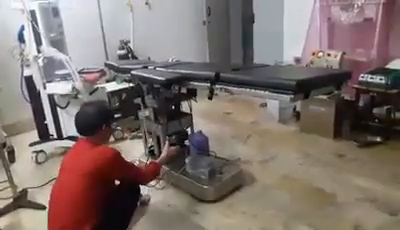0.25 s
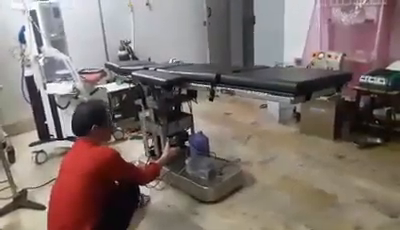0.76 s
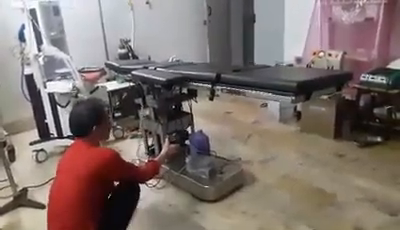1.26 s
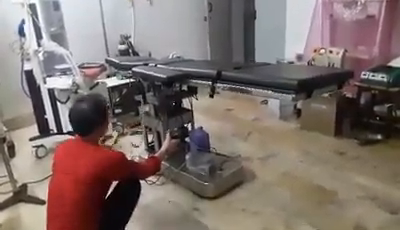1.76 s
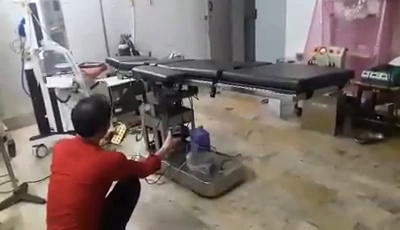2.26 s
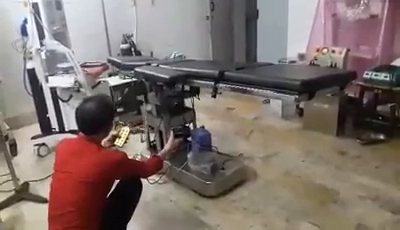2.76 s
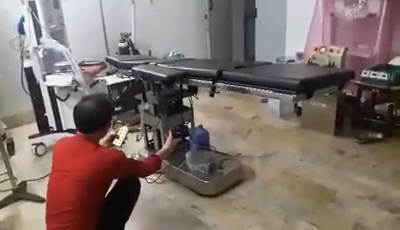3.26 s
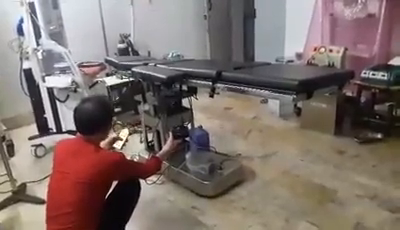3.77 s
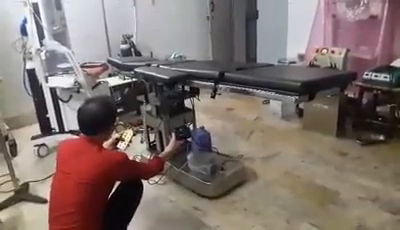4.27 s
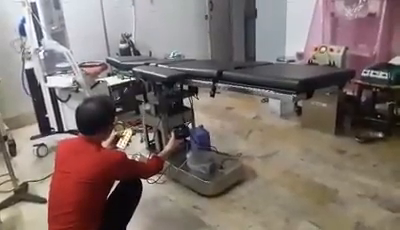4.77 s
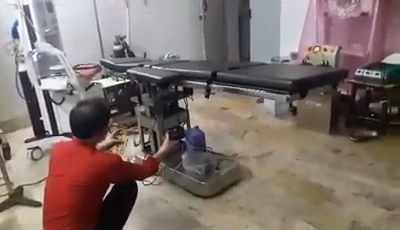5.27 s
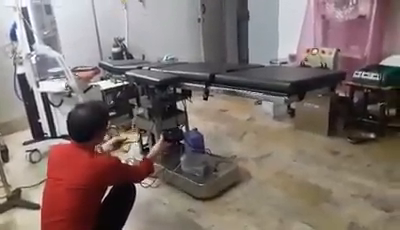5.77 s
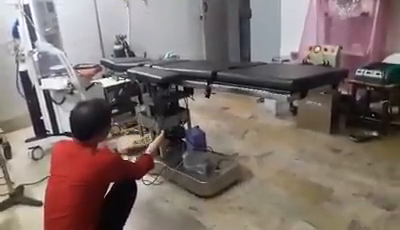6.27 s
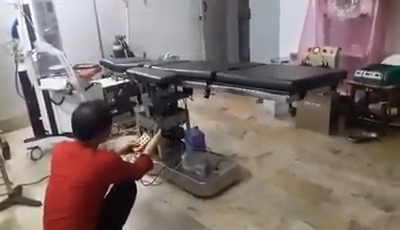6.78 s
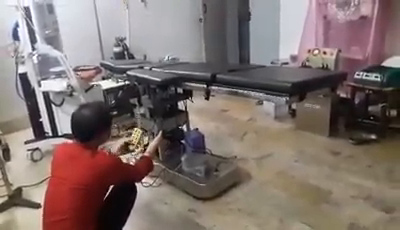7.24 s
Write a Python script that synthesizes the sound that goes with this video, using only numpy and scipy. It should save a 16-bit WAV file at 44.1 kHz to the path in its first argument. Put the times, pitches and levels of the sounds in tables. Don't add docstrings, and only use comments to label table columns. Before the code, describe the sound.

A steady electric gear motor whines and hums under a steel table in a hard-floored room, wavering slightly, with two faint cable scuffs.

```python
import sys
import numpy as np
from scipy import signal
from scipy.fft import rfft, irfft
from scipy.io import wavfile
from scipy.ndimage import uniform_filter1d

SR = 44100
rng = np.random.default_rng(int(sys.argv[2]) if len(sys.argv) > 2 else 0)


def linear_from_db(decibels):
    return 10 ** (np.asarray(decibels, float) / 20)


def waveform_to_disk(signal):
    frames = np.transpose(np.atleast_2d(signal))
    scaled = np.clip(frames, -1, 1) * 32767
    samples = np.round(scaled).astype(np.int16)
    wavfile.write(sys.argv[1], SR, samples)


N = 331191
HZ = np.fft.rfftfreq(N, 1 / SR)

HEAVY_DB = (0.5, 2.3, 0.29, 3.4)
# centre in Hz, width in Hz, level in dB rms.
FRAME_BODY = [(426.5, 27, -50), (667, 52, -46), (850, 134, -42.5)]
# frequency in Hz, level in dB rms.
FRAME = [(557.8, -60), (628.5, -47), (668.2, -49), (685.0, -49.5), (724.7, -64), (837.1, -51.5),
         (853.9, -52.5), (901.0, -45), (913.8, -51.5), (937.4, -53)]
# centre in Hz, width in Hz, level in dB rms.
HOUSING_BODY = [(1223, 230, -47), (1427, 88, -36), (1851, 260, -43), (2310, 770, -52.5), (2698, 290, -44),
                (3427, 220, -46.5), (4145, 390, -51.5)]


def gears():
    # frequency in Hz, level in dB rms.
    mesh_lines = [(264.5, -53.5), (292.7, -45.5), (310.2, -43), (326.4, -50.5), (335.8, -52.5),
                  (343.2, -45.5)]
    # centre in Hz, width in Hz, level in dB rms.
    gear_body = [(325, 99, -50.5)]
    # time in s, half length in s, change in dB.
    mesh_swells = [
        (1.7, .3, 9),
        (2.3, 0.17, 7.5),
        (5.75, 0.12, 4),
        (6.5, 0.25, -5),
        (7.3, 0.19, 3.5),
    ]
    sideband_share = 0.34
    mesh = load_level(HEAVY_DB[0], mesh_swells)
    inner = tones(mesh_lines[1:3], waver_db=1.5, slip=0.62, rate=1.65)
    outer = tones(mesh_lines[:1] + mesh_lines[3:], waver_db=0.9, slip=0.67, rate=1.73)
    return mesh * inner + rms_one(mesh ** sideband_share) * (outer + body(gear_body))


def housing():
    # frequency in Hz, level in dB rms.
    modes = [(1026.9, -50), (1096.2, -60), (1131.2, -50.5), (1154.7, -55), (1201.1, -49.5), (1282.6, -52),
             (1324.4, -45), (1344.5, -50), (1360.5, -47.5), (1400.5, -41.5), (1411.5, -41.5),
             (1440.7, -39.5), (1461.2, -42.0)]
    # time in s, half length in s, change in dB.
    whine_swells = [
        (1.0, 0.092, -4),
        (1.7, 0.28, -2.5),
        (2.25, .06, -5),
        (5.33, 0.041, 7),
        (5.95, 0.27, 2.5),
        (7.45, 0.25, 4),
    ]
    whine = tones(modes, waver_db=2.5, slip=1.02, rate=2.6) + body(HOUSING_BODY[:2])
    return load_level(HEAVY_DB[3], whine_swells) * whine


def lower_frame():
    # time in s, half length in s, change in dB.
    lower_swells = [
        (.55, 0.18, -4),
        (1.2, 0.4, 3.5),
        (1.8, 0.53, -2),
        (2.5, 0.35, 4.0),
        (3.85, .1, -2),
    ]
    ringing = tones(FRAME[:5], waver_db=1.0, slip=0.9, rate=2.8) + body(FRAME_BODY[:2])
    return load_level(HEAVY_DB[1], lower_swells) * ringing


def upper_frame():
    # time in s, half length in s, change in dB.
    upper_swells = [
        (.3, 0.073, 4),
        (1.35, .15, 3),
        (2.75, 0.31, 5.5),
        (3.3, 0.13, 5.5),
        (5.27, .1, -4.0),
        (5.7, .22, 3.5),
    ]
    ringing = tones(FRAME[5:], waver_db=3.5, slip=0.68, rate=1.7) + body(FRAME_BODY[2:])
    return load_level(HEAVY_DB[2], upper_swells) * ringing


def casing():
    # frequency in Hz, level in dB rms.
    modes = [(1948.1, -57.5), (2538.9, -55.5), (2641.9, -56.5), (2701.7, -54), (2851.8, -56.5),
             (3296.6, -59.5), (3332.9, -50), (3425.6, -54), (3472.9, -55), (3495.8, -57.5)]
    # time in s, half length in s, change in dB.
    casing_swells = [
        (3.0, 0.57, 1.1),
        (4.6, .7, 2.7),
        (7.5, 0.22, 2.3),
    ]
    ringing = tones(modes, waver_db=2.5, slip=0.83, rate=1.8) + body(HOUSING_BODY[2:])
    return rms_one(linear_from_db(swells(casing_swells))) * ringing


def shaft():
    # frequency in Hz, level in dB rms.
    orders = [(23.6, -75), (47.1, -73), (70.0, -54.5), (139.3, -65), (209.3, -52.5)]
    # time in s, level in dB.
    shaking = [(0.0, -56), (0.31, -53.5), (0.48, -64), (1.07, -58.5), (1.13, -73), (1.36, -54), (1.53, -69),
               (2.72, -52), (4.85, -50), (5.4, -59), (5.58, -53), (5.63, -65), (6.28, -52), (6.65, -64),
               (6.69, -55), (6.96, -83), (7.03, -59.5), (7.51, -53)]
    # time in s, half length in s, change in dB.
    order_swells = [
        (1.0, 0.12, 6),
        (1.45, 0.082, 6.0),
        (2.1, .25, -5),
        (4.0, .2, -1),
        (4.75, 0.11, 5),
        (6.5, 0.36, 5),
        (7.45, .2, -6),
    ]
    low = rms_one(linear_from_db(in_time(shaking)[0])) * tones(orders[:3], waver_db=-0.6, slip=.4, rate=1.0)
    high = tones(orders[3:], waver_db=1.6, slip=0.52, rate=1.4)
    return low + rms_one(linear_from_db(swells(order_swells))) * high


def tooth_ticks(per_s=90, level_db=-48):
    sizes = linear_from_db(3.0 * np.minimum(rng.exponential(1, N), 3)) * rng.choice([-1, 1], N)
    clicks = sizes * (rng.random(N) < per_s / SR)
    return linear_from_db(level_db) * rms_one(band(clicks, 900, 3600))


def whirr():
    # frequency in Hz, level in dB per Hz.
    spectrum = [(12, -67), (20, -27), (64, -29.5), (232, -17.5), (297, -3.5), (380, -12.5), (745, -11.5),
                (872, -11.5), (1070, -12), (1430, -5), (1670, -15), (3070, -15), (3360, -12), (3760, -21),
                (4300, -21.5), (5590, -52), (9460, -120)]
    level_db = -32.5 + 0.24 * drift(8.4)
    return linear_from_db(level_db) * room(coloured(at_hz(spectrum)))


def rumble():
    # time in s, half length in s, change in dB.
    rumble_swells = [
        (1.4, 0.25, 6.5),
        (3.6, 0.25, 7.5),
        (4.3, .5, 5.5),
        (6.4, 0.52, 13),
    ]
    level_db = -55.5 + swells(rumble_swells) + 1.5 * drift(5.6)
    return linear_from_db(level_db) * rms_one(band(rng.standard_normal(N), 107, 233))


def scuffs():
    # start in seconds, level in dB, time to fall 60 dB in seconds.
    puffs = [
        (2.645, -51, .25),
        (7.21, -56, .3),
    ]
    t = np.arange(N) / SR
    shape = np.zeros(N)
    for start, level_db, t60 in puffs:
        shape += linear_from_db(level_db - 60 * np.clip(t - start, 0, 1) / t60) * (t > start)
    return shape * rms_one(band(rng.standard_normal(N), 7000, 15000))


def load_level(extra_db, rows):
    ease_s, ease_length_s = 3.55, .15
    heavy = np.clip((ease_s - np.arange(N) / SR) / ease_length_s + .5, 0, 1)
    return rms_one(linear_from_db(extra_db * heavy + swells(rows)))


def swells(rows):
    t = np.arange(N) / SR
    return sum(level_db * np.exp(-((t - s) / half) ** 2) for s, half, level_db in rows)


def tones(lines, waver_db, slip, rate):
    t, out = np.arange(N) / SR, np.zeros(N)
    for hz, level_db in lines:
        phase = 2 * np.pi * (hz * t + rng.random()) + slip * drift(rate)
        envelope = rms_one(linear_from_db(waver_db * drift(rate)))
        out += np.sqrt(2) * linear_from_db(level_db) * envelope * np.sin(phase)
    return out


def body(resonances):
    out = np.zeros(N)
    for hz, width, level_db in resonances:
        out += linear_from_db(level_db) * coloured(1 / (1 + (2 * (HZ - hz) / width) ** 2))
    return room(out)


def room(x):
    t60_s, tail_db = .7, -8
    t = np.arange(SR // 2) / SR
    response = rng.standard_normal(len(t)) * linear_from_db(-60 * t / t60_s) * (t > .004)
    response *= linear_from_db(tail_db) / np.sqrt(np.sum(response ** 2))
    response[0] = 1
    return irfft(rfft(x) * rfft(response, N), N) / np.sqrt(np.sum(response ** 2))


def drift(rate):
    r = np.exp(-200 * np.pi * rate / SR)
    slow = signal.lfilter([1], [1, -2 * r, r * r], rng.standard_normal(N // 100 + 1002))[1000:]
    return np.interp(np.arange(N) / 100, np.arange(len(slow)), rms_one(slow))


def coloured(gain):
    return rms_one(irfft(rfft(rng.standard_normal(N)) * gain, N))


def band(x, low_hz, high_hz):
    return signal.sosfilt(signal.butter(N=4, Wn=[low_hz, high_hz], btype="band", fs=SR, output="sos"), x)


def at_hz(points, grid=HZ):
    hz, level_db = np.transpose(points)
    return linear_from_db(np.interp(np.log(grid + 1), np.log(hz), level_db))


def in_time(rows):
    s, *columns = np.transpose(rows)
    return [np.interp(np.arange(N) / SR, s, c) for c in columns]


def inside(spans, t, edge):
    return sum(np.clip(np.minimum(t - a, b - t) / edge + .5, 0, 1) for a, b in spans)


def rms_one(x):
    return x / np.sqrt(np.mean(np.abs(x) ** 2) + 1e-20)


def scene():
    machine = gears() + housing() + lower_frame() + upper_frame() + casing() + shaft() + tooth_ticks()
    sound = machine + whirr() + rumble() + scuffs()
    return np.array([sound, sound])


def local_level(cells, bins, frames):
    power = uniform_filter1d(np.abs(cells) ** 2, size=bins, axis=0)
    return np.sqrt(uniform_filter1d(power, size=frames, axis=1) + 1e-16)


def rebuild_treble(x, flatten=0.98):
    # start in seconds, end in seconds.
    dropouts = [(0.035, 0.107), (0.221, 0.403), (0.557, 0.621), (0.682, 0.874), (0.94, 1.086),
                (1.411, 1.515), (1.672, 1.808), (1.927, 1.988), (2.093, 2.215), (2.444, 2.583),
                (2.694, 2.792), (2.862, 2.963), (3.033, 3.088), (3.376, 3.474), (3.547, 3.776),
                (3.84, 4.159), (4.272, 4.76), (4.83, 4.873), (5.123, 5.576), (5.677, 5.738), (5.808, 5.866),
                (5.979, 6.075), (6.15, 6.206), (6.278, 6.377), (6.5, 6.638), (6.748, 6.847), (7.045, 7.14),
                (7.216, 7.509)]
    # frequency in Hz, level in dB per Hz.
    envelope = [(2530, -35), (4300, -1), (4930, -6.5), (5400, 2.5), (6000, -2.5), (6600, 3.5), (7220, -0.5),
                (7810, -8.5), (8110, -4.5), (8690, 3.5), (9210, -3), (10200, -11), (11600, -16.5),
                (14300, -22.5), (15200, -24)]
    crossover_hz, top_hz = 4430, 15460
    weak_low_hz, weak_high_hz = 3615, 3985
    shift = 160
    frames = dict(fs=SR, window="cosine", nperseg=1882)
    hz, t, cells = signal.stft(x, **frames)
    hz = hz[:, None]

    lows = cells * (hz < crossover_hz)
    step = .8 * np.clip(hz / 2300, 0, 1) ** 4
    lows = lows * (np.abs(lows) > step * local_level(lows, bins=35, frames=9))
    level = local_level(lows, bins=13, frames=5) ** np.clip(flatten, 0, 1)
    weak = (hz > weak_low_hz) & (hz < weak_high_hz)
    dropped = np.clip(inside(dropouts, t, edge=.01), 0, 1)
    lows = lows * (1 - weak * dropped)

    source = lows / level * (np.arange(len(hz))[:, None] >= crossover_hz / hz[1] - shift)
    copies = rms_one(sum(np.roll(source, k * shift, axis=0) for k in (1, 2, 3)))
    fill = rms_one(signal.stft(rng.standard_normal(N), **frames)[2]) * linear_from_db(1.7 + hz / 8000)
    fill = fill * (1 - .4 * dropped * sum(np.roll(weak, k * shift) for k in (1, 2, 3)))
    top = linear_from_db(-6.0) * (1 - dropped)
    shape = at_hz(envelope, hz) * (hz > crossover_hz) * (hz < top_hz) * np.where(hz > 15000, top, 1)
    treble = signal.istft((copies + fill) * shape, **frames)[1][:N]

    passed = lows + cells * (hz > crossover_hz + 2000)
    treble_db = -37.5 + .5 * drift(15) + 0.61 * drift(70)
    return signal.istft(passed, **frames)[1][:N] + linear_from_db(treble_db) * rms_one(treble)


def top_cut(x):
    return signal.sosfilt(signal.butter(12, 15430, fs=SR, output="sos"), x)


def record(dry):
    # start in seconds, end in seconds.
    splits = [
        (.06, 0.1),
        (.78, 0.81),
        (1.07, 1.14),
        (2.27, 2.34),
        (2.91, 2.94),
        (3.26, 3.27),
        (4.45, 4.51),
    ]
    low_cut = signal.butter(N=2, Wn=45, btype="high", fs=SR, output="sos")
    mid = rebuild_treble(signal.sosfilt(low_cut, dry[0]))
    unlike = band(mid[::-1], 120, 14800)
    side = linear_from_db(-25) * inside(splits, np.arange(N) / SR, edge=0.0076) * unlike
    return top_cut(np.array([mid + side, mid - side]))


dry = scene()
out = record(dry)
waveform_to_disk(out)
```